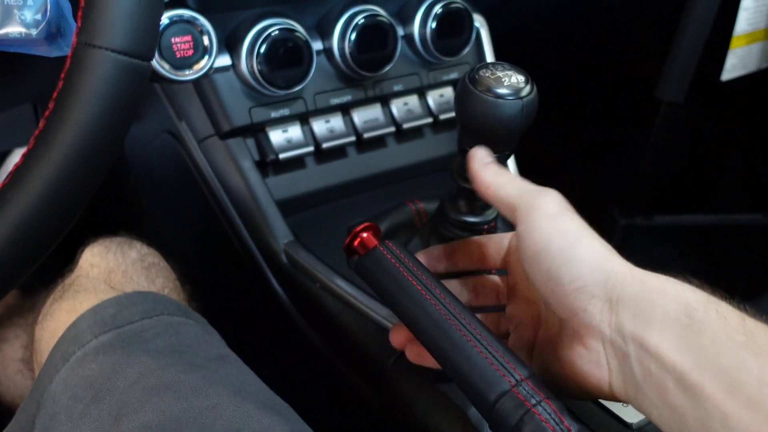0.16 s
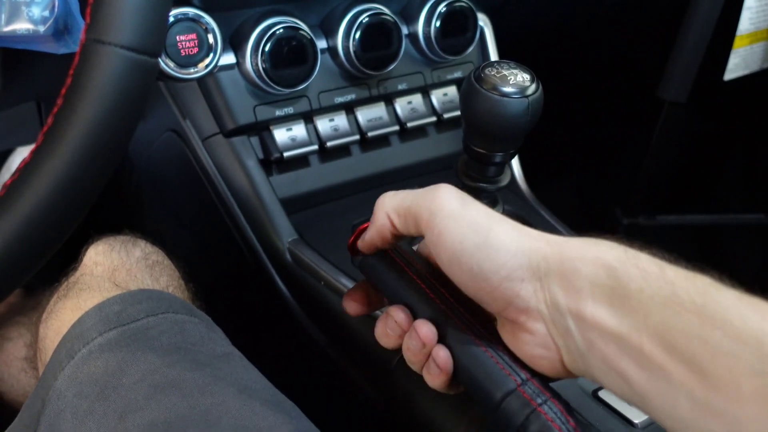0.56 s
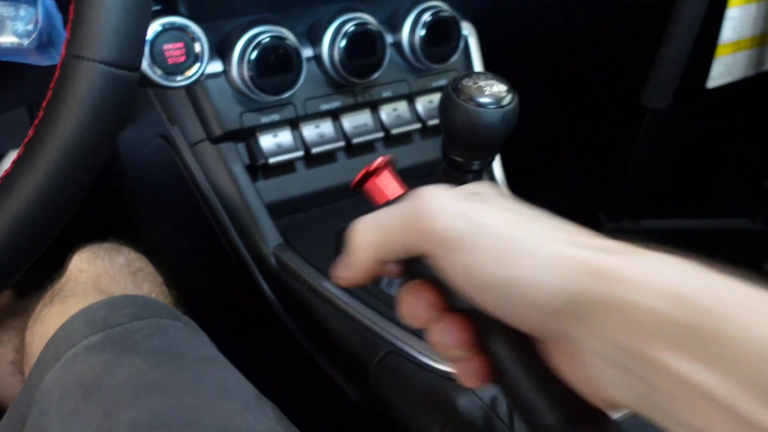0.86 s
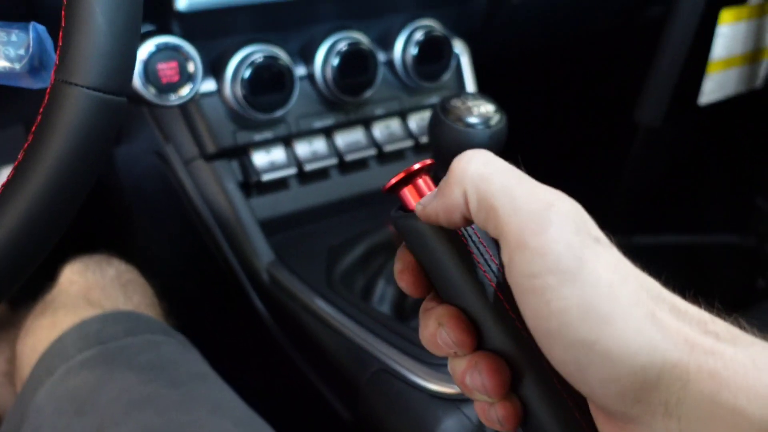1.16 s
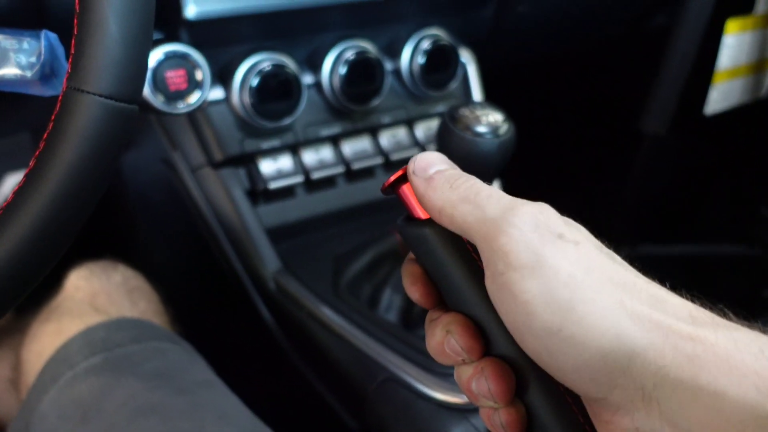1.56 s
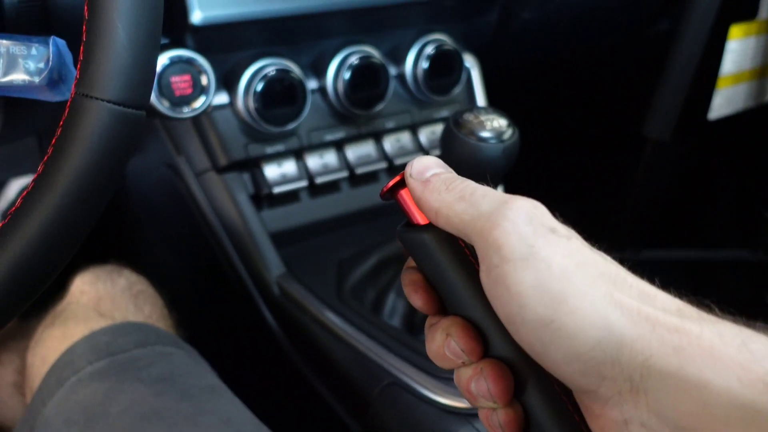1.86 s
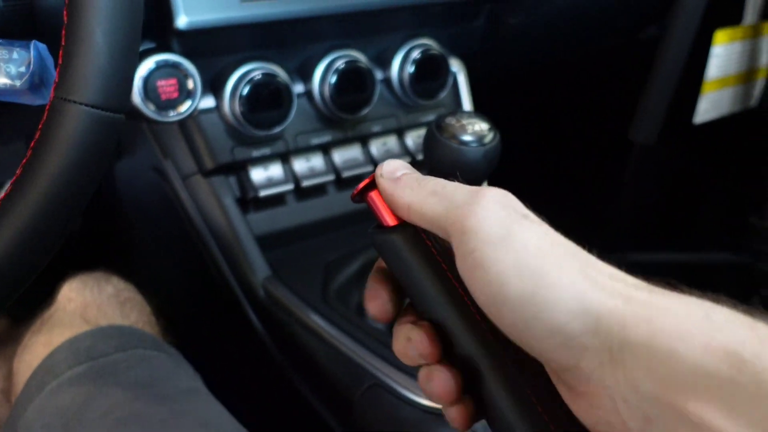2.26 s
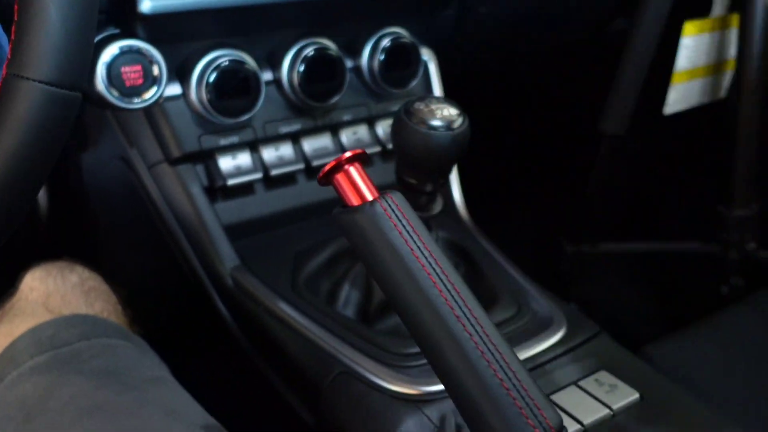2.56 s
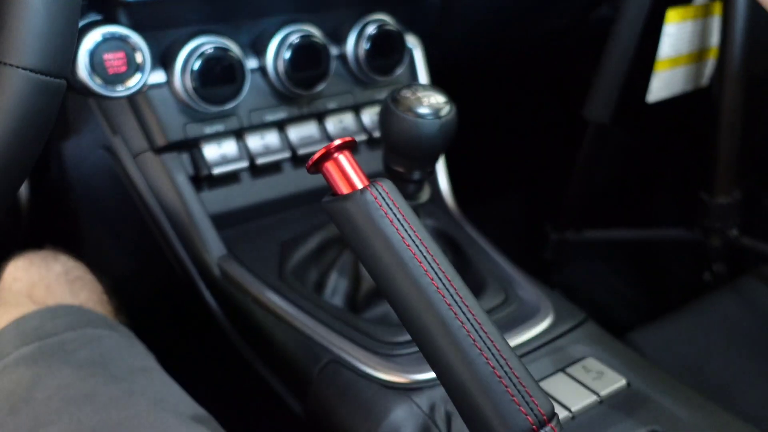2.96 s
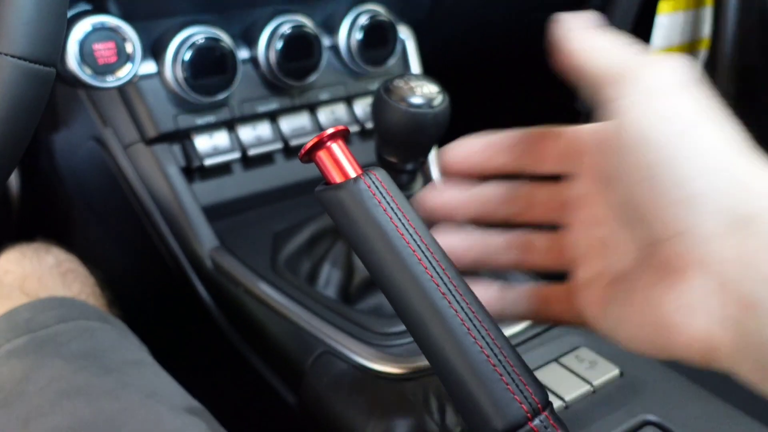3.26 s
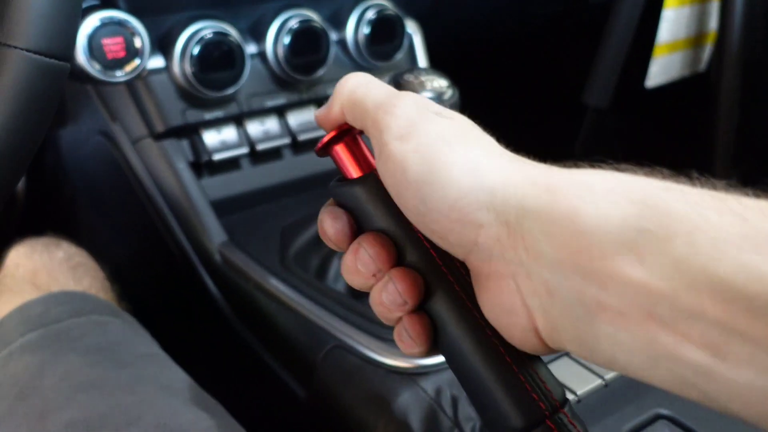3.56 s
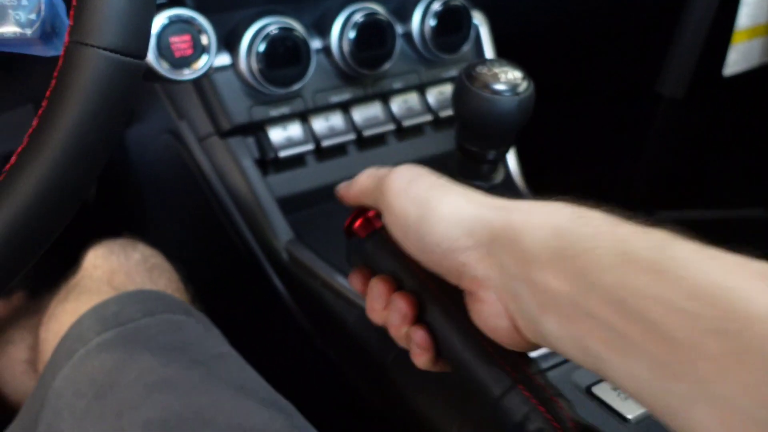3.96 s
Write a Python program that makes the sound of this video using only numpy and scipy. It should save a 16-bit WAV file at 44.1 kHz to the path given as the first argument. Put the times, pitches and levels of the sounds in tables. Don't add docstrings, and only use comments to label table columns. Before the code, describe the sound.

A handbrake lever clicks and rattles in quick bursts inside a quiet parked car, ending with one very hard clunk, over faint hum.

```python
import sys
import numpy as np
from scipy import signal
from scipy.fft import rfft, irfft
from scipy.io import wavfile
from scipy.ndimage import uniform_filter1d

SR = 44100
rng = np.random.default_rng(int(sys.argv[2]) if len(sys.argv) > 2 else 0)


def dump(signal):
    limited = np.clip(np.atleast_2d(signal).T, -1, 1)
    pcm = np.round(limited * 32767).astype(np.int16)
    wavfile.write(sys.argv[1], SR, pcm)


def linear_from_db(decibels):
    return 10 ** (np.asarray(decibels, float) / 20)


N = 180765


def evened(x):
    return x / np.sqrt(np.mean(x ** 2) + 1e-20)


def read(points, hz):
    f, value = np.transpose(points)
    return np.interp(np.log(hz + 1), np.log(f + 1), value)


def add(mix, start_s, sound):
    part = mix[round(start_s * SR):][:len(sound)]
    part += sound[:len(part)]


def coloured(x, db_of):
    return irfft(rfft(x) * linear_from_db(db_of(np.fft.rfftfreq(len(x), 1 / SR))), len(x))


def drift(rate_hz):
    t = np.arange(N) / SR
    wander = np.zeros(N)
    for f in np.geomspace(.2, rate_hz, num=12):
        wander += np.sin(2 * np.pi * (f * t + rng.random())) / np.sqrt(f)
    return evened(wander)


# frequency in Hz, density in dB per Hz.
AIR_SPECTRUM = [(20, -27), (42, -9), (65, -10.5), (95, -7), (148, -14.5), (250, -18.5), (412, -29),
                (501, -22.5), (544, -24), (781, -29.5), (1000, -34), (1480, -36.5), (9000, -46.5),
                (15200, -55.5)]
# time in seconds, level in dB.
AIR_LEVEL = [(0, -54.5), (1, -55), (2.2, -54.5), (2.8, -54), (3.3, -55), (4.1, -48)]
# frequency in Hz, level in dB, wander in Hz.
HUM_LINES = [(58, -62, 1.07), (119.8, -49.5, 0.11), (239, -66.5, 1.5), (514, -74, 2.76), (615, -76.5, 1.52),
             (930, -79.5, 3.39)]
# time in seconds, firing rate in Hz, level in dB.
MOTOR_SPEED = [(0, 65.15, -68), (.9, 70.3, -60.5), (1.5, 73.5, -59.5), (2.2, 77.9, -62), (2.9, 83.4, -64),
               (3.5, 85.2, -67.5)]
MOTOR_ORDERS_DB = [2, -3, -0.3, -13.5, -17.5, -13.5, -10]


def outside():
    t = np.arange(N) / SR
    air_db = np.interp(t, *np.transpose(AIR_LEVEL)) + 0.26 * drift(3.27)
    out = linear_from_db(air_db) * evened(coloured(rng.standard_normal(N), lambda hz: read(AIR_SPECTRUM, hz)))
    tones = [(hz + wander_hz * drift(4.2), db) for hz, db, wander_hz in HUM_LINES]
    s, hz, db = np.transpose(MOTOR_SPEED)
    rate_hz = np.interp(t, s, hz) + 0.383 * drift(7.4)
    motor_db = np.interp(t, s, db)
    for order, order_db in enumerate(MOTOR_ORDERS_DB, start=1):
        tones.append((order * rate_hz, motor_db + order_db))
    for tone_hz, tone_db in tones:
        level = linear_from_db(tone_db + 1.5 + 0.93 * drift(11))
        out += level * np.sin(2 * np.pi * np.cumsum(tone_hz) / SR)
    return out


# frequency in Hz, density in dB per Hz.
SKIN_SPECTRUM = [(120, -40.5), (250, 3.5), (450, 3.5), (900, -6), (1600, -12.5), (2300, -8.5), (3700, -8.5),
                 (8300, -16.5), (15200, -31)]
# peak time in seconds, rise in seconds, fall in seconds, peak in dB, brightness in dB.
RUB_STROKES = [(0.01, 0.026, 0.21, -60.5, 6.5), (.2, 0.28, 0.034, -66.5, 0), (.7, 0.2, 0.1, -60.5, 1),
               (1.03, 0.17, 0.26, -46.5, -4), (1.13, .1, .22, -55, -2), (1.699, 0.0374, 0.27, -47, -2),
               (2.12, 0.25, 0.35, -67.5, -7.5), (2.49, 0.086, 0.15, -49.5, 4.5),
               (3.425, 0.22, 0.15, -57, 3), (3.552, 0.012, 0.13, -68.5, 24), (3.646, .01, .03, -63.5, 12),
               (3.598, 0.062, 0.063, -49.5, 0), (3.889, 0.14, 0.21, -44, -8), (3.87, .03, 0.17, -66.5, 23),
               (3.999, 0.23, 0.33, -56, -5), (4.088, 0.13, 0.11, -47, 1.5)]
STROKE_END_DB = -37


def rubs():
    slips = rng.standard_normal(N) * linear_from_db(3.23 * np.minimum(rng.exponential(size=N), 5.5))
    slips *= linear_from_db(0.57 * evened(uniform_filter1d(rng.standard_normal(N), size=250)))
    slips = evened(coloured(slips, lambda hz: read(SKIN_SPECTRUM, hz)))

    def treble_db(hz):
        return -20 * np.log10(1 + (6500 / (hz + 1)) ** 2) + 2.6 * np.log2(1 + hz / 9000)

    high = coloured(slips, treble_db)
    low = slips - high
    t, out = np.arange(N) / SR, np.zeros(N)
    for peak_s, rise_s, fall_s, db, bright_db in RUB_STROKES:
        away = np.maximum((peak_s - t) / rise_s, (t - peak_s) / fall_s)
        out += linear_from_db(db + STROKE_END_DB * away) * (low / linear_from_db(bright_db) + high * linear_from_db(bright_db))
    return out


def ring(modes, t, spot_hz, chance):
    out = np.zeros(len(t))
    for (hz, db, t60_s), c in zip(modes, chance):
        off_spot_db = min(22 * np.log2(hz / spot_hz) ** 2, 16)
        level = np.sign(c) * linear_from_db(db + 5.6 * abs(c) - off_spot_db - 60 * t / t60_s)
        out += level * np.sin(2 * np.pi * hz * (1 + 0.017 * c) * t)
    return out


# frequency in Hz, level in dB, t60 in seconds.
PANEL_MODES = [(490, -5, .07), (611, -5, .07), (684, -2, .09), (758, -4, .07), (813, 1, .08),
               (931, -6, .08), (1020, -9, .06), (1130, -8, .08), (1330, -11, .07)]
# start in seconds, peak in dB, struck spot in Hz.
PANEL_KNOCKS = [(0.676, -50.5, 710), (0.958, -50, 700), (1.001, -28, 650), (1.019, -46, 705),
                (1.041, -26.5, 830), (1.064, -20.5, 546), (1.086, -22.5, 837), (1.106, -33, 834),
                (1.13, -26, 785), (1.696, -30.5, 690), (1.716, -19.5, 712), (2.145, -40.5, 750),
                (2.5, -33, 1100), (2.514, -32.5, 624), (2.534, -34, 505), (2.699, -43, 597),
                (3.576, -38, 685), (3.587, -32, 647), (3.603, -28, 580), (3.617, -34, 625),
                (3.676, -36, 800), (3.686, -25.5, 1230), (3.695, -26, 735), (3.835, -12.5, 860),
                (3.845, -14.5, 813), (3.86, -14.5, 780), (3.877, -34, 900), (3.58, -41, 1190)]
# frequency in Hz, level in dB, t60 in seconds.
PAN_MODES = [(76, -3, .1), (98, -3, .11), (148, 1, .17), (172, -5, .13), (206, -2, .12), (240, -3, .09),
             (314, -4, .09), (365, -6, .08), (416, -4, .08)]
# start in seconds, peak in dB, struck spot in Hz.
PAN_THUDS = [(0.676, -44.5, 110), (0.958, -46, 143), (1.002, -48, 430), (1.019, -38, 140), (1.04, -31, 103),
             (1.064, -28.5, 144), (1.085, -23, 93), (1.106, -29.5, 139), (1.128, -32.5, 150),
             (1.715, -37.5, 132), (1.733, -42, 157), (2.143, -43.5, 97), (2.153, -31.5, 222),
             (2.5, -38.5, 110), (2.513, -33.5, 262), (2.697, -43.5, 223), (3.587, -34.5, 316),
             (3.603, -28.5, 268), (3.675, -36.5, 254), (3.695, -32, 261), (3.835, -20.5, 367),
             (3.847, -24, 140), (3.859, -21, 139), (3.877, -24.5, 159), (3.891, -30.5, 148), (4, -38.5, 99)]
HAND_DAMP_DB_PER_S = 348
CONTACT_SIGMA_S, CONTACT_REF_DB, CONTACT_DB_PER_DB = 0.00017, -19, 0.04


def thuds():
    out, t = np.zeros(N), np.arange(13000) / SR
    chances = rng.uniform(-1.2, 1, (len(PANEL_KNOCKS), len(PANEL_MODES)))
    for (s, db, spot_hz), chance in zip(PANEL_KNOCKS, chances):
        sound = linear_from_db(db - 3.5 - HAND_DAMP_DB_PER_S * t) * ring(PANEL_MODES, t, spot_hz, chance)
        sound *= 1 - np.exp(-t / 0.00075)
        sigma_s = CONTACT_SIGMA_S * linear_from_db(CONTACT_DB_PER_DB * (db - CONTACT_REF_DB))
        push = np.exp(-.5 * (t[:200] - .002) ** 2 / sigma_s ** 2)
        add(out, s - .002, np.convolve(sound, push / push.sum()))
    chances = rng.uniform(-1.4, 1, (len(PAN_THUDS), len(PAN_MODES)))
    for (s, db, spot_hz), chance in zip(PAN_THUDS, chances):
        swell = 1 - np.exp(-t / 0.0015)
        add(out, s, linear_from_db(db + 0.5) * ring(PAN_MODES, t, spot_hz, chance) * swell)
    return out


# start in seconds, peak in dB, treble over 6 kHz in dB, struck part in Hz.
FINGER_TOUCHES = [(0.6794, -52, -29, 2890), (0.7194, -53.5, -3, 3550), (1.2391, -42.5, -20, 4485),
                  (1.2614, -50.5, -4, 2212), (1.3971, -40.5, -20, 6120), (1.4094, -45.5, -9, 3944),
                  (2.0565, -46, -28, 2066), (2.1276, -43, -34.5, 2940), (2.1454, -45.5, -26, 2430),
                  (2.439, -53.5, 6.5, 5700), (2.4583, -49, -1, 5670), (2.4705, -38, -9.5, 3500),
                  (2.4896, -40.5, 3.5, 5910), (2.5354, -47.5, 15, 2740)]
STOP_CLICKS = [(0.981, -33.5, -28, 2900), (1.0002, -17, -24.5, 3200), (1.0415, -27.5, -24, 2880),
               (1.0614, -23, -38, 3630), (1.066, -12, -11, 6150), (1.0869, -13, -5, 5690),
               (1.0966, -14, -22, 5960), (1.1024, -20, -26, 4650), (1.1293, -25, -18.5, 2380),
               (1.6924, -22.5, -10, 5640), (1.6974, -23, -12, 6500), (1.701, -17.5, -18, 2370),
               (1.7214, -17.5, -14.5, 3780), (2.4981, -23.5, -28, 3860), (2.518, -31, -15.5, 2430),
               (2.6943, -30.5, -11, 3330), (3.6028, -25, -20.5, 4130), (3.6869, -24, -12, 3880),
               (3.69, -18, -19, 2470), (3.8335, -11, 0, 3400), (3.8405, -13.5, -8.5, 2870),
               (3.8545, -15.5, -24, 3000), (3.8764, -30, -21, 2030)]
DAMPED_CONTACTS = [
    (.9978, -15.5, -28, 2480),
    (1.086, -16.5, -25, 2940),
    (1.138, -28.5, -20.5, 3660),
    (1.7155, -7, -12, 2640),
    (2.506, -26, -7.5, 2930),
    (2.5095, -19, -27, 3530),
    (2.699, -29, -16, 3600),
    (3.8351, 6.5, -7.5, 3010),
]
# frequency in Hz, density in dB per Hz.
CRACK_SPECTRUM = [(700, -85), (1200, -6), (1700, -19), (2200, -7), (3000, -9.5), (4200, -5), (6500, -3),
                  (10000, -6.5), (12500, -13), (15200, -25.5)]
# frequency in Hz, width in Hz, level in dB.
LEVER_PEAKS = [(2190, 59, -3.5), (3010, 49, -11.5), (3480, 30, -8.5), (7470, 120, -3.5), (8200, 34.4, -9),
               (8530, 95, -16.5), (10000, 29, -27.5), (11000, 79, -4.5), (13900, 110, -19)]
T60_DB_PER_DB = 0.0261


def clicks():
    out = np.zeros(N)
    for rows, t60_s, part_db in [(FINGER_TOUCHES, 0.031, .1), (STOP_CLICKS, 0.054, .1),
                                 (DAMPED_CONTACTS, 0.021, 5.9)]:
        for s, db, treble_db, part_hz in rows:
            add(out, s + .0003, contact(db, treble_db, part_hz, t60_s, part_db))
    return out


def contact(db, treble_db, part_hz, t60_s, part_db):
    t = np.arange(4096) / SR
    grit = rng.standard_normal(len(t)) * linear_from_db(1.95 * rng.exponential(size=len(t)))

    def colour_db(hz):
        lever = 0.66 + sum(linear_from_db(d) / np.hypot(1, 2 * (hz - f) / width) for f, width, d in LEVER_PEAKS)
        part = linear_from_db(part_db) / (1 + (2 * (hz - part_hz) / 700) ** 2)
        shelf_db = (treble_db + 7) / (1 + (6000 / (hz + 1)) ** 4)
        return read(CRACK_SPECTRUM, hz) + 20 * np.log10(lever + part) + shelf_db

    rattle = coloured(grit, colour_db)
    low = coloured(rattle, lambda hz: -60. * (hz > 6000))
    t60_s = t60_s * linear_from_db(T60_DB_PER_DB * (db + 6.5))
    fade = linear_from_db(-60 * t / t60_s) + 0.57 * np.exp(-t / 0.001)
    return linear_from_db(db - 10) * rattle / np.sqrt(np.mean(low ** 2)) * fade * (1 - np.exp(-t / 0.00055))


# frequency in Hz, level in dB, t60 in seconds.
BUTTON_MODES = [(7780, -6, 0.026), (9750, 0, 0.028), (10800, -1, 0.032)]
ROD_MODES = [(2148, 2.5, 0.0206), (2308, 3, 0.024), (2430, 2.5, 0.014), (2975, -2.5, 0.049),
             (3400, -7.5, .028), (3600, 8.5, .016)]
BOOT_MODES = [(1197, 3, 0.06), (1338, -2.5, .05), (1508, -2, 0.033), (1770, 0, 0.059)]
# start in seconds, peak in dB, struck spot in Hz.
BUTTON_STRIKES = [(1.01, -29, 8650), (1.097, -11.5, 7950), (1.101, -23, 9750), (1.699, -27.5, 9960),
                  (1.706, -31.5, 9900), (1.7165, -19, 11000), (1.721, -19, 9580), (1.722, -22, 7670),
                  (2.506, -41, 10100), (2.695, -42, 10800), (3.604, -46.5, 10160)]
ROD_STRIKES = [(1.0015, -33.5, 3700), (1.1305, -37, 2305), (1.139, -31.5, 3720), (1.702, -33, 2330),
               (1.7165, -28, 3303), (2.696, -35, 3180), (2.6964, -34.5, 2550), (3.605, -37.5, 2380),
               (3.692, -36, 2430), (3.836, -7.5, 2165), (3.8362, -13.5, 2990)]
BOOT_STRIKES = [(1.002, -36, 1290), (1.002, -38.5, 1780), (1.043, -38, 1350), (1.065, -34.5, 1250),
                (1.095, -42, 1550), (1.7166, -38, 1200), (2.503, -44, 1340), (3.59, -44, 1220),
                (3.693, -36, 1316), (3.836, -19, 1480), (3.852, -23.5, 1250), (3.858, -25, 1700)]


def rings():
    out, t = np.zeros(N), np.arange(4096) / SR
    for modes, strikes in [(BUTTON_MODES, BUTTON_STRIKES), (ROD_MODES, ROD_STRIKES),
                           (BOOT_MODES, BOOT_STRIKES)]:
        for s, db, spot_hz in strikes:
            chatter_db = 3.6 * evened(uniform_filter1d(rng.standard_normal(len(t)), size=60))
            tone = np.zeros(len(t))
            for hz, mode_db, t60_s in modes:
                off_spot_db = 310 * np.log2(hz / spot_hz) ** 2
                tone += linear_from_db(mode_db - off_spot_db - 60 * t / t60_s) * np.sin(2 * np.pi * hz * t)
            add(out, s, linear_from_db(db + chatter_db) * tone * (1 - np.exp(-t / 0.00044)))
    return out


# frequency in Hz, t60 in seconds.
CABIN_T60 = [(150, 0.15), (800, 0.11), (3000, 0.032), (10000, 0.016)]


def cabin(x):
    hz, t, z = signal.stft(rng.standard_normal(SR // 3), SR, nperseg=128)
    decay = linear_from_db(-60 * t / read(CABIN_T60, hz)[:, None])
    tail = signal.istft(z * decay, SR, nperseg=128)[1]
    return signal.fftconvolve(x, tail / np.linalg.norm(tail))[:N]


def scene():
    background = outside() + rubs()
    lever = thuds() + clicks() + rings()
    return (background + lever + linear_from_db(-13.0) * cabin(lever))[None]


def band_limit(x):
    return signal.sosfilt(signal.butter(12, 15370, fs=SR, output="sos"), x)


def record(dry):
    heard = signal.sosfilt(signal.butter(2, 55, "high", fs=SR, output="sos"), dry)
    return band_limit(np.clip(heard, -1, 1))


dry = scene()
out = record(dry)
dump(out)
```